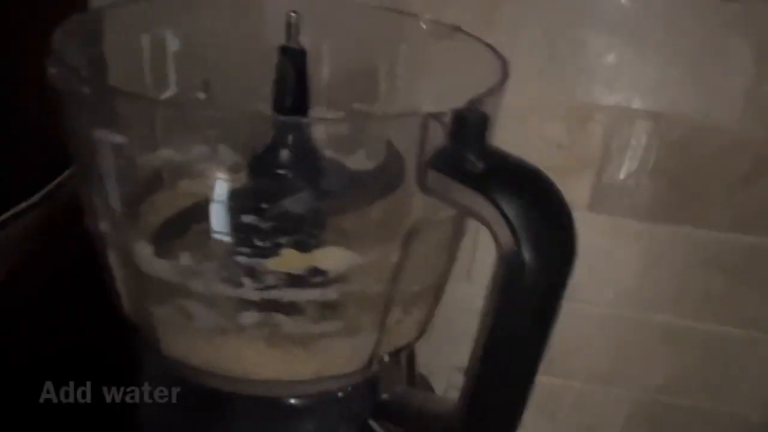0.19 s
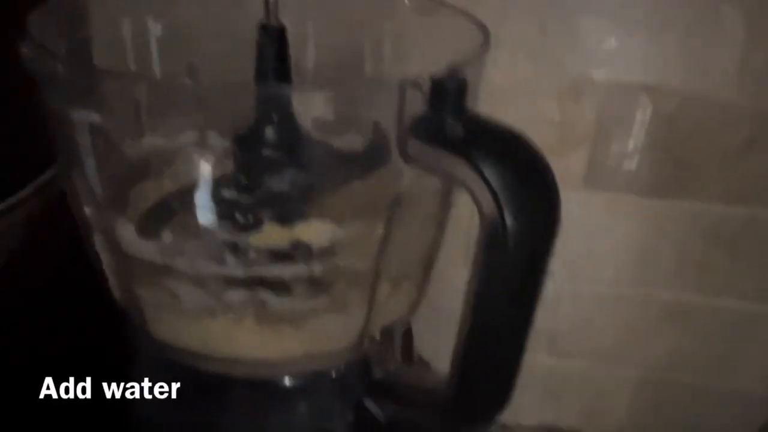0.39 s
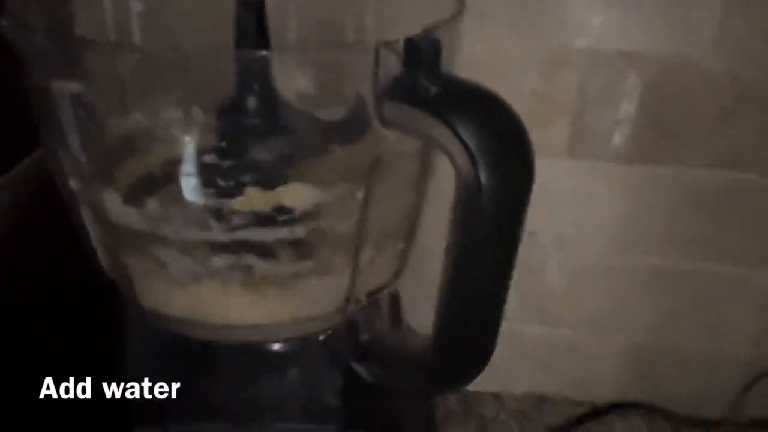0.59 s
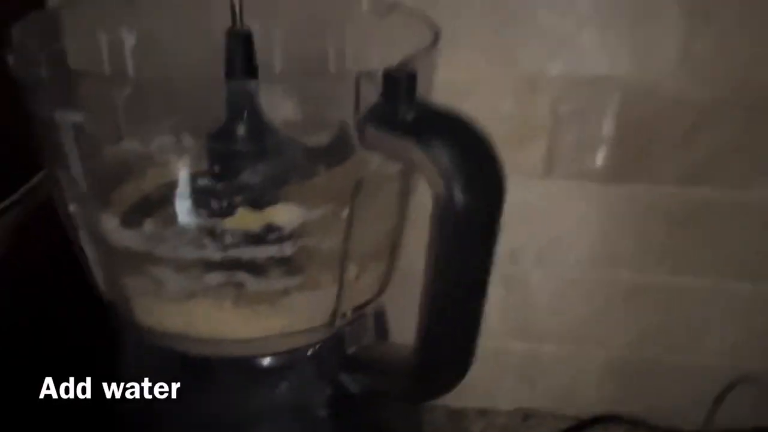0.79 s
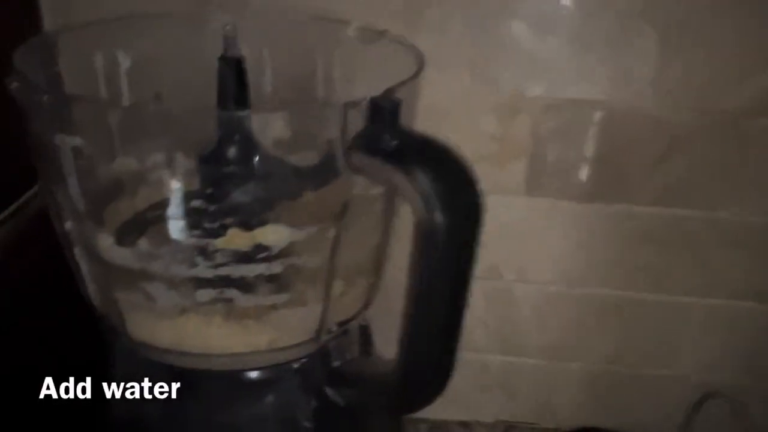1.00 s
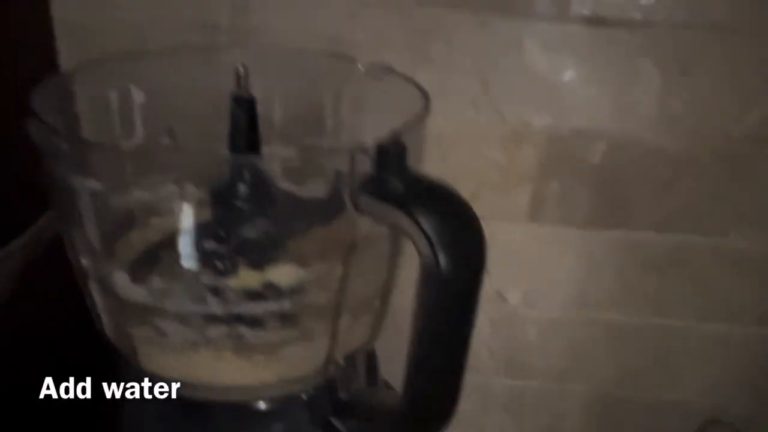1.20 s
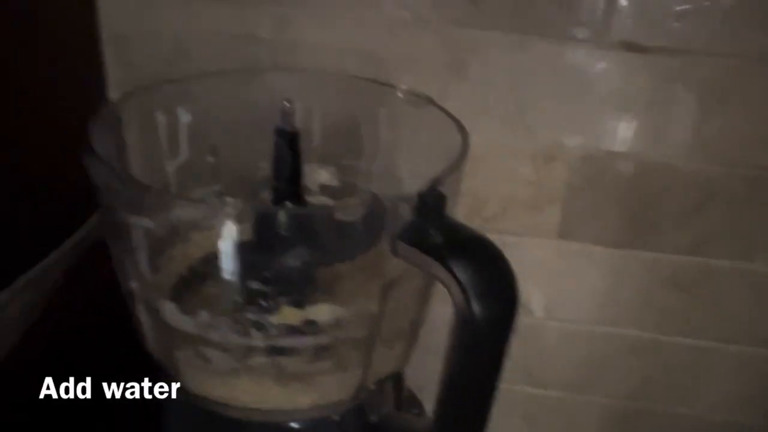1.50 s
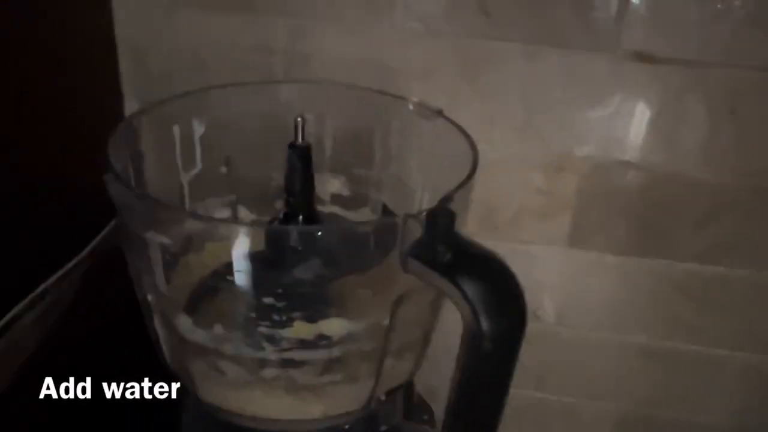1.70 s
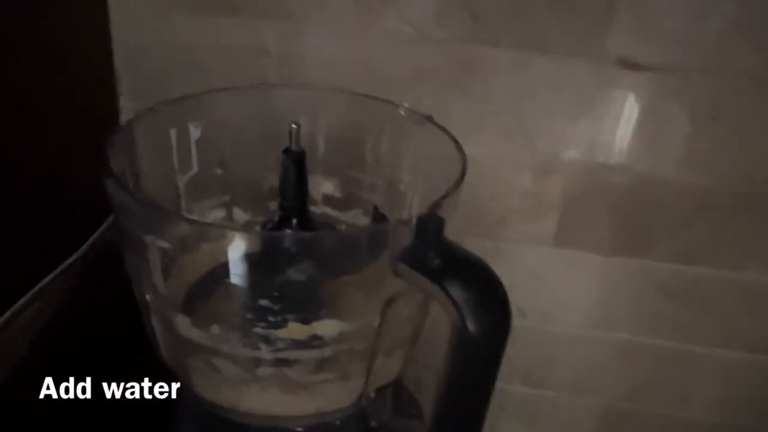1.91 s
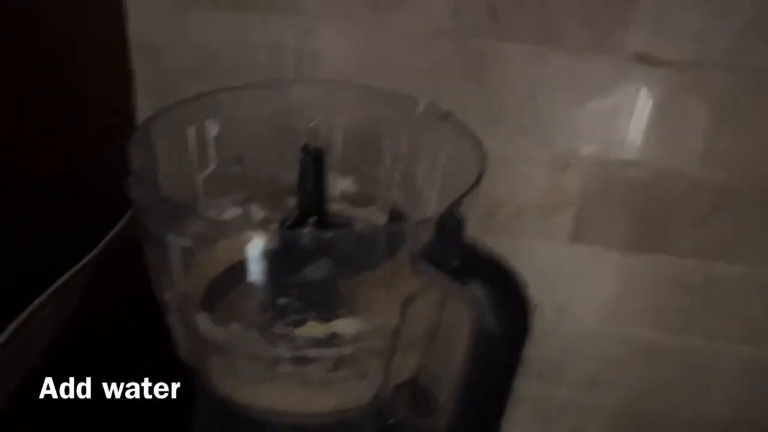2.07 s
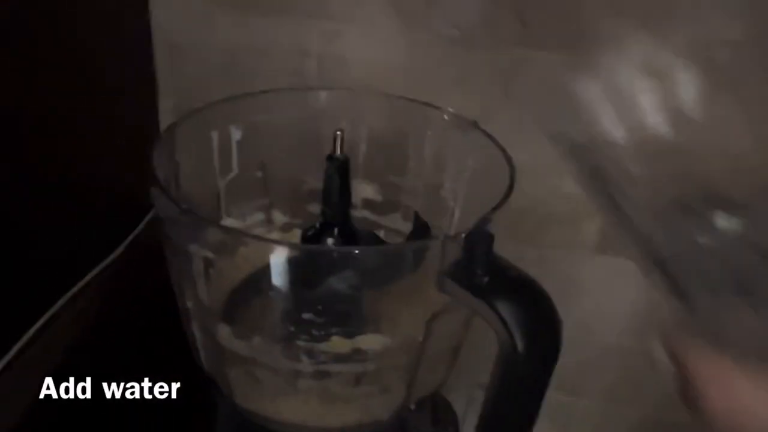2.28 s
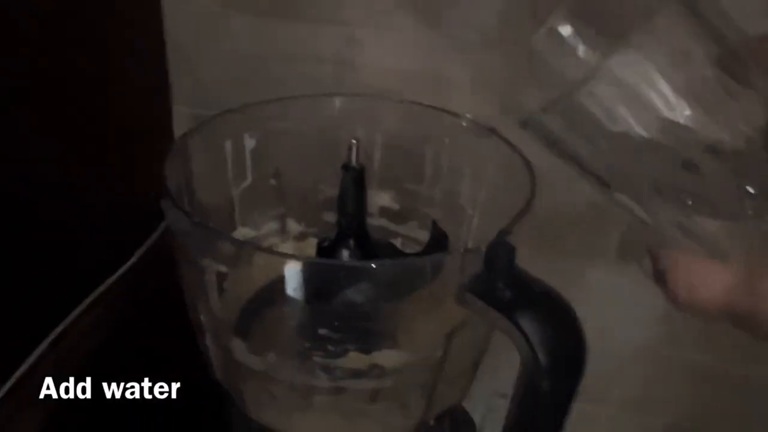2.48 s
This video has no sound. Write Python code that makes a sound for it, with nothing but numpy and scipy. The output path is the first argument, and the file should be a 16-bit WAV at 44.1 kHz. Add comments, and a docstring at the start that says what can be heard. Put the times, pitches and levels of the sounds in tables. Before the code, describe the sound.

A hollow plastic jug knocks sharply on a counter close to a phone microphone, rattles, thuds again more softly and settles in faint taps, in a hard-walled kitchen with a low fridge hum.

```python
"""A fridge hums and rumbles in a hard-walled kitchen; then a plastic jug is knocked on the counter close
to a phone, rocks and settles with smaller taps. The food processor is off.
The fridge is wavering sines, the air is filtered noise, and each knock rings decaying modes of jug,
counter and cabinet with a noise crack. Soft swells of noise grains give rubs and faint lingering room
sound; a noise tail gives the room."""
import sys
import numpy as np
from scipy import signal
from scipy.fft import rfft, irfft
from scipy.io import wavfile
from scipy.ndimage import uniform_filter1d

SR = 44100
rng = np.random.default_rng(int(sys.argv[2]) if len(sys.argv) > 2 else 0)


def to_wav(sig):
    """Store sig (one row per channel, or 1-D mono) as 16-bit WAV at the path in sys.argv[1].

    Samples outside -1..1 are clipped; the rate is SR.
    """
    pcm = np.clip(np.atleast_2d(sig), -1, 1) * 32767
    pcm = np.round(pcm).astype(np.int16)
    wavfile.write(sys.argv[1], SR, pcm.T)  # frames by channels


N = 114660  # length in samples
PORTS = np.array([[1], [-1]])  # sign at the left and right microphone port

# Left-right balance of the fridge and the room air: hz, left_minus_right_db
BACKGROUND_PAN = [(60, 0.5), (110, 1.0), (200, 2.5), (380, 4), (700, -0.5), (1290, -0.5), (2380, 0.5),
                  (4400, -4.5), (8120, -2.5), (15000, -0.5)]


def amp(db):
    """Amplitude factor of a level in dB."""
    return 10 ** (np.asarray(db) / 20)


def along(table, hz):
    """Value of a (Hz, value) table on a log-frequency axis."""
    points = np.array(table, float)
    return np.interp(np.log(np.maximum(hz, 1)), np.log(points[:, 0]), points[:, 1])


def shape(x, gain):
    """Filter by a gain given as a function of frequency."""
    length = x.shape[-1]
    hz = np.arange(length // 2 + 1) * SR / length
    return irfft(rfft(x) * gain(hz), length)


def unit(x):
    """Scale to an RMS of 1."""
    return x / np.sqrt(np.mean(x ** 2))


def walk(rate):
    """Random levels of RMS 1, held 1 / rate s and slewed twice."""
    hold = int(SR / rate)
    steps = np.repeat(rng.standard_normal(N // hold + 1), hold)
    return unit(uniform_filter1d(uniform_filter1d(steps, hold), hold)[:N])


def decay(t, t60):
    """Exponential decay that falls 60 dB in t60 seconds."""
    return np.exp(-np.log(1000) * t / t60)


def ring(modes, t, swell_s):
    """Decaying sines of an object after one blow, with a soft onset and signs running + - - + + - -."""
    total = 0
    for k, (hz, db, t60) in enumerate(modes):
        sign = (-1) ** ((k + 1) // 2)
        total = total + sign * amp(db) * np.sin(2 * np.pi * hz * t) * decay(t, t60)
    return (1 - np.exp(-t / swell_s)) * total


def fridge():
    """Compressor tones wavering slightly in pitch and level, in phase at both ports but unequal in level."""
    # Compressor tones: hz, level_db (RMS, before panning), pitch_waver (RMS share of hz)
    tones = [(58.35, -49.5, .002), (160.7, -68.5, 0.033), (187.3, -73, 0.0081), (366, -72, .003),
             (425, -79.5, .005), (510, -78.5, .004), (1107.8, -92, .003), (1400, -100.5, .003)]
    level_waver_db = 2  # RMS
    out = 0
    for hz, db, waver in tones:
        level = amp(db + level_waver_db * walk(9.1)) * np.sqrt(2)
        phase = 2 * np.pi * np.cumsum(hz * (1 + waver * walk(12))) / SR
        pan = amp(along(BACKGROUND_PAN, hz) * PORTS / 2)
        out = out + level * np.sin(phase) * pan
    return out


def air():
    """Room rumble and hiss as noise bands that flicker separately; a thin treble hiss swells and fades."""
    # Colour of the room noise: hz, relative_db_per_hz
    spectrum = [(25, -41), (42, -14.5), (60, -3), (81, -1), (117, -9), (153, -3), (195, -10.5), (225, -18),
                (372, -18.5), (523, -21.5), (600, -30.5), (1010, -36.5), (1620, -46), (3000, -50.5),
                (5850, -53), (8000, -55), (9400, -70), (11500, -57.5), (13500, -61.5), (14200, -79.5),
                (15800, -79.5)]
    # Stereo spread of the room noise: hz, side_minus_mid_db
    spread = [(60, -24.5), (110, -15.5), (200, -9.5), (380, -2.5), (700, 2.5), (1290, -2), (2380, 1),
              (4400, -1), (8120, -1), (15000, -2)]
    # Swells of the thin treble hiss: time_s, level_db
    treble_swells = [(0, -89), (.2, -100), (0.601, -87), (.95, -102), (1.8, -102), (2.098, -85), (2.6, -99)]
    level_db, flicker_db = -53.5, 1  # overall RMS; RMS swing of each band

    mid = shape(rng.standard_normal(N), lambda f: amp(along(spectrum, f)))
    side = shape(rng.standard_normal(N), lambda f: amp(along(spectrum, f) + along(spread, f)))
    both = shape(mid + PORTS * side, lambda f: amp(along(BACKGROUND_PAN, f) * PORTS / 2))
    rumble = 0
    for hz in 25 * 2. ** np.arange(10):  # overlapping octave bands
        band = shape(both, lambda f: np.clip(1 - abs(np.log2((f + 1) / hz)), 0, 1))
        rumble = rumble + amp(flicker_db * walk(7.4)) * band

    treble = unit(shape(rng.standard_normal((2, N)), lambda f: np.exp(-((f - 12000) / 1300) ** 4)))
    curve = np.array(treble_swells)
    treble_level = amp(np.interp(np.arange(N) / SR, curve[:, 0], curve[:, 1]))
    return amp(level_db) * unit(rumble) + treble * treble_level


def crack_noise(tilt_db, contact_s, t):
    """Short bright noise of a contact: partly shared by the ports, with a fast and a slower decay."""
    # Colour of the crack: hz, relative_db_per_hz
    spectrum = [(900, -8), (1300, -11.5), (2500, -15), (4000, -19.5), (5700, -22), (7900, -23),
                (9300, -33.5), (11100, -22), (13500, -32.5), (14300, -48.5), (15300, -38)]
    width = 0.55  # level of the part opposite at the two ports, relative to the shared part
    swell_contacts = 2.5  # swell in contact times
    t60_s, tail_db, tail_t60_s = 0.039, -11, .12

    def colour(f):
        tilted_db = along(spectrum, f) + tilt_db * np.log2((f + 50) / 2500)
        return amp(tilted_db) / (1 + (800 / (f + 1)) ** 4)  # little below 800 Hz

    mid, side = rng.standard_normal((2, len(t)))
    hiss = unit(shape(mid + width * side * PORTS, colour))
    swell = 1 - np.exp(-t / (swell_contacts * contact_s))
    return hiss * swell * (decay(t, t60_s) + amp(tail_db) * decay(t, tail_t60_s))


def knocks():
    """Each contact pushes jug, counter and cabinet and gives off a short crack; tiny glassy pings join in."""
    # Contacts, levels relative: start_s, jug_db, counter_db, cabinet_thump_db, crack_db,
    # crack_tilt_db_per_octave, contact_ms
    contacts = [(0.2339, -9, -30.5, -20, -19.5, -3.5, 0.38), (0.2377, -12.5, -15, -46.5, -27.5, 0, 0.36),
                (0.2432, -20.5, -28, -39.5, -30.5, -1.5, 0.38), (0.2495, -16, -52, -39, -31.5, -6, 0.58),
                (0.2599, -31, -18, -35, -35, -0.5, 0.71), (0.279, -27.5, -21.5, -34.5, -26, -4, 0.45),
                (0.396, -57, -11, -28, -39, -1, 0.37), (0.4005, -39, -20, -45.5, -28.5, -7.5, 0.51),
                (0.409, -46, -24.5, -45, -58, -3, 0.55), (0.487, -63, -46, -44, -56, 1, .8),
                (0.511, -56, -32.5, -53.5, -45, 1, 0.4), (0.516, -68, -28, -60.5, -62, -12, 0.88),
                (0.556, -62, -71, -56, -58, 4.5, 0.66), (0.594, -61.5, -52, -64, -56.5, 2, 1.1),
                (0.622, -58, -45, -59.5, -49, -5.5, 1.14), (0.655, -64, -48, -71, -59.5, -9, 0.51),
                (0.716, -73, -41.5, -58, -68, 1, 0.77), (0.866, -75.5, -69, -68, -61.5, -6.5, 0.49),
                (0.924, -72.5, -48.5, -71, -66, -14, .7), (1.002, -79, -44, -69, -78.5, -7.5, .8),
                (1.118, -79, -57.5, -78, -78, -3, .8), (1.255, -78, -61.5, -83, -70.5, -3.5, 0.54),
                (1.35, -64.5, -49, -71, -72, 2, .8), (1.553, -81, -65.5, -76, -73, 0, .5)]
    # Modes of the plastic jug: hz, relative_db, t60_s
    jug_modes = [(282.5, -13.5, .07), (535, -9, .06), (690.7, -2, .05), (774, -4.5, 0.039),
                 (871, 4.5, 0.038), (932.4, -4.5, 0.032), (1214, -9, 0.056), (1431, -23.5, 0.054),
                 (1482, -21.5, 0.18), (1893, -16, 0.066), (2550.5, -10.5, .06), (2728, -19.5, 0.093),
                 (3320, -13.5, 0.049), (4900, -19.5, 0.058)]
    # Modes of the counter: hz, relative_db, t60_s
    counter_modes = [(215, -13.5, 0.065), (320, -8, 0.041), (375, -11.5, 0.037), (433.6, 4, 0.037),
                     (542, -6.5, .06), (1195, -16, 0.088), (2300, -22.5, 0.014)]
    # Modes of the cabinet: hz, relative_db, t60_s
    cabinet_modes = [(64.2, -7.5, .4), (91.36, -0.5, 0.32), (147, -7, 0.39), (197.9, -3.5, 0.14),
                     (292.2, -15, 0.14)]
    # Tiny glassy pings: start_s, hz, relative_db, t60_s
    ping_table = [(.594, 3900, -60, .04), (1.352, 6500, -82, .2)]
    jug_swell_s, counter_swell_s, cabinet_swell_s = 0.001, 0.0048, 0.01

    out, t = np.zeros((2, N + SR)), np.arange(SR // 2) / SR
    jug = ring(jug_modes, t, jug_swell_s)
    counter = ring(counter_modes, t, counter_swell_s)
    cabinet = ring(cabinet_modes, t, cabinet_swell_s)
    for start, jug_db, counter_db, thump_db, crack_db, tilt_db, ms in contacts:
        # A longer push dulls the ring
        push = np.sin(np.pi * np.clip(t[:200] / (ms / 1000), 0, 1)) ** 2
        body = amp(jug_db) * jug + amp(counter_db) * counter + amp(thump_db) * cabinet
        pushed = np.convolve(body, push / push.sum())[:len(t)]
        crack = amp(crack_db) * crack_noise(tilt_db, ms / 1000, t)
        i = int(start * SR)
        out[:, i:i + len(t)] += pushed + crack
    for start, hz, db, t60 in ping_table:
        i = int(start * SR)
        out[:, i:i + len(t)] += ring([(hz, db, t60)], t, jug_swell_s)
    return out[:, :N]


def soft_swells():
    """Soft band-limited swells of random noise grains among the knocks: rubs and faint lingering room sound."""
    # Noise swells: start_s, length_s, relative_db, filter_corner_hz
    swell_table = [(0.285, 0.11, -56.5, 1500), (0.414, 0.14, -66, 1160), (0.539, 0.051, -71.5, 4040),
                   (0.624, 0.23, -78.5, 1806), (0.86, 0.091, -74, 3000), (1.345, 0.034, -68.5, 596),
                   (1.552, 0.053, -80, 2400)]
    grains_per_s, scatter_db = 8100, 1
    out, t = np.zeros(N), np.arange(N) / SR
    for start, length, db, hz in swell_table:
        hits = rng.random(N) < grains_per_s / SR
        grains = hits * rng.standard_normal(N) * amp(scatter_db * rng.standard_normal(N))
        noise = unit(shape(grains, lambda f: f / hz / (1 + (f / hz) ** 3)))
        swell = np.sqrt(np.sin(np.pi * np.clip((t - start) / length, 0, 1)).clip(0))
        out += amp(db) * noise * swell
    return out


def room(x):
    """Tiled walls: a noise tail that builds up and dies away band by band, different at each port."""
    # Reverberation time: hz, t60_s
    room_t60 = [(80, 1), (300, .5), (1000, 0.4), (4000, 0.46), (14000, 0.12)]
    level_db, build_s = -16, .006
    mono_hz = 700  # below this the ports share more of the tail
    t, tail = np.arange(SR) / SR, 0
    for hz in 50 * 2. ** np.arange(9):
        mid, side = rng.standard_normal((2, SR))
        noise = mid + min(hz / mono_hz, 1) * side * PORTS
        band = shape(noise, lambda f: np.exp(-(np.log2((f + 1) / hz) / 0.66) ** 2))
        tail = tail + band * decay(t, along(room_t60, hz))
    tail = tail * (1 - np.exp(-t / build_s))
    tail = tail / np.sqrt(np.sum(tail ** 2) / 2)  # mean energy 1 per port
    return amp(level_db) * signal.fftconvolve(x[None], tail, axes=1)[:, :N]


def at_ports(near):
    """Close sounds reach the two ports with level and phase differences that vary with frequency."""
    # Level difference: hz, left_minus_right_db
    port_balance = [(60, -2.5), (110, 0.0), (200, 5), (380, 7.5), (700, -4), (1290, -3.5), (2380, 7.5),
                    (4400, -3.5), (8120, -3), (15000, 0.5)]
    # Phase difference: hz, left_lead_radians
    port_lead = [(60, 0), (520, 0.04), (1290, -2), (1890, -0.5), (3010, -1.3), (6000, -1), (12000, -4.5)]
    half = PORTS / 2
    return shape(near, lambda f: amp(along(port_balance, f) * half) * np.exp(1j * along(port_lead, f) * half))


def scene():
    """Close knocks and soft swells with their room tail, over the fridge and the air."""
    near = knocks() + soft_swells()
    return at_ports(near) + room(near.mean(axis=0)) + fridge() + air()


def record(dry):
    """The phone cuts the lowest bass and the top."""
    bass_cut_hz, top_hz = 33, 15900
    dry = signal.sosfilt(signal.butter(2, bass_cut_hz, "high", fs=SR, output="sos"), dry)
    return signal.sosfilt(signal.ellip(10, .2, 80, top_hz, fs=SR, output="sos"), dry)


dry = scene()
out = record(dry)
to_wav(out)
```